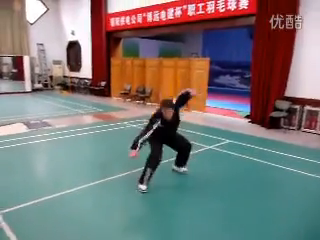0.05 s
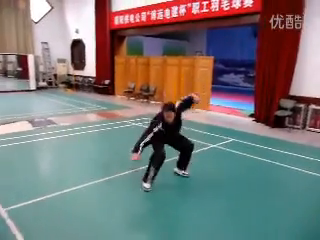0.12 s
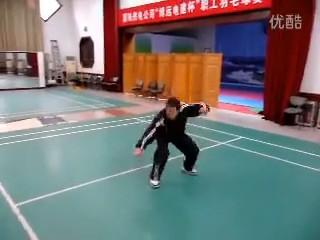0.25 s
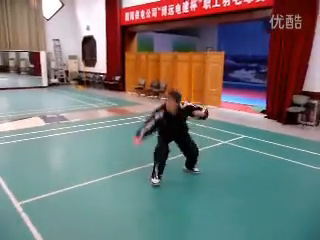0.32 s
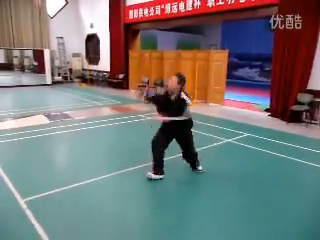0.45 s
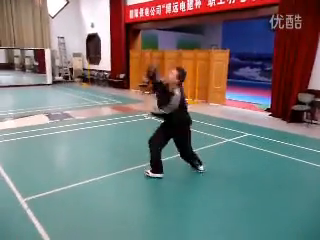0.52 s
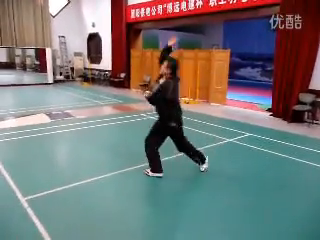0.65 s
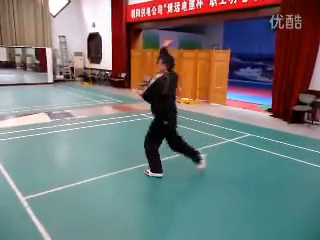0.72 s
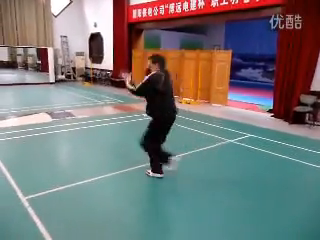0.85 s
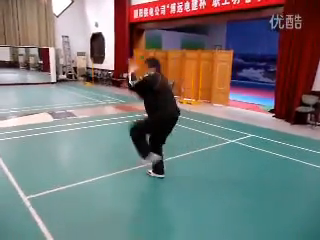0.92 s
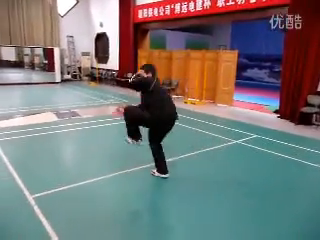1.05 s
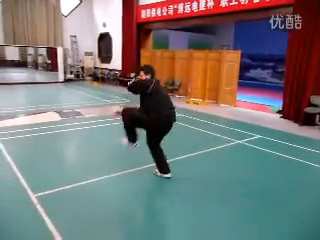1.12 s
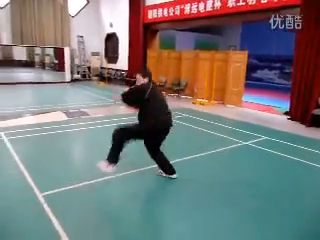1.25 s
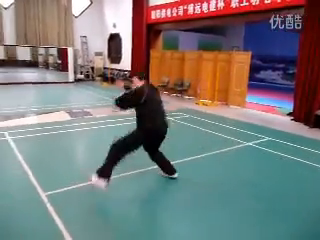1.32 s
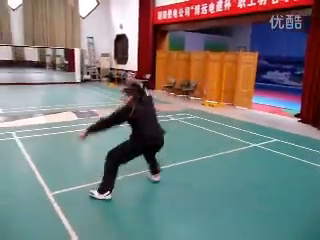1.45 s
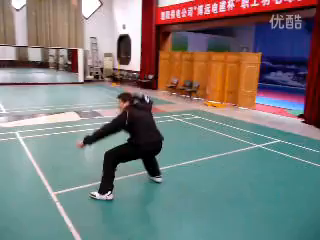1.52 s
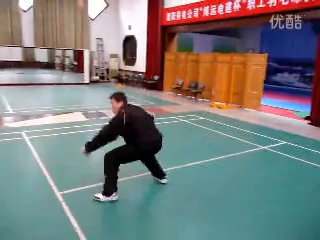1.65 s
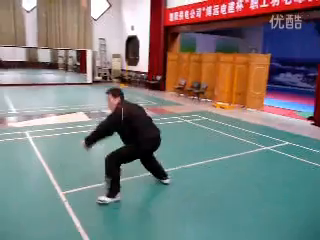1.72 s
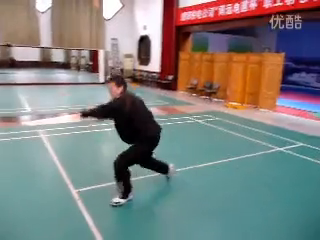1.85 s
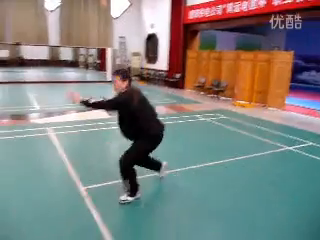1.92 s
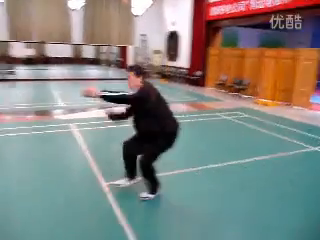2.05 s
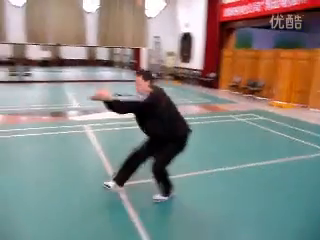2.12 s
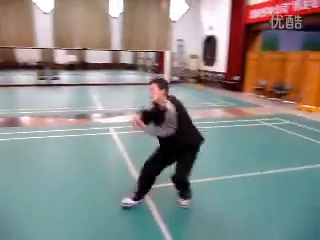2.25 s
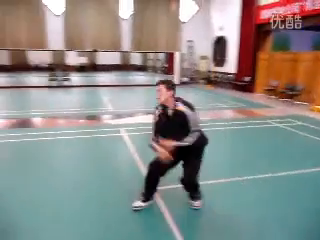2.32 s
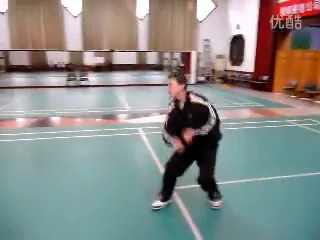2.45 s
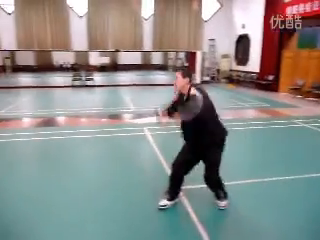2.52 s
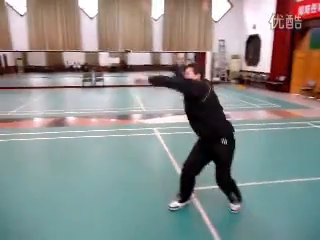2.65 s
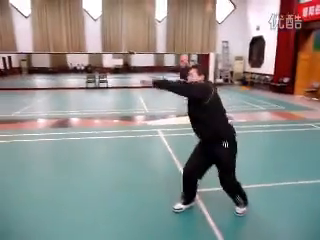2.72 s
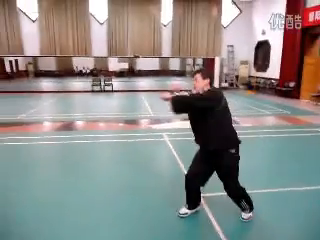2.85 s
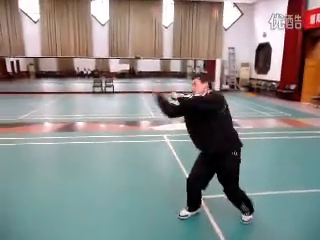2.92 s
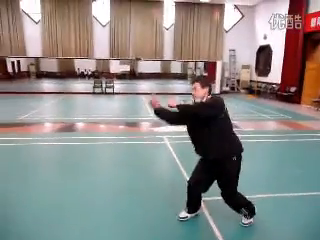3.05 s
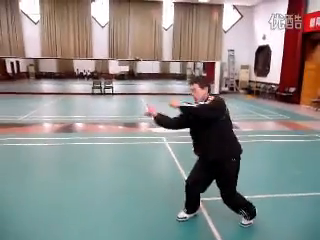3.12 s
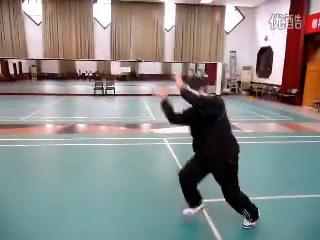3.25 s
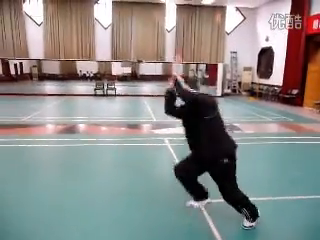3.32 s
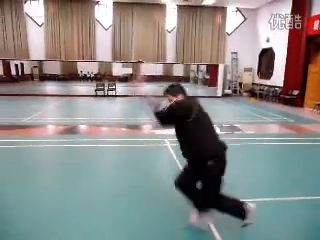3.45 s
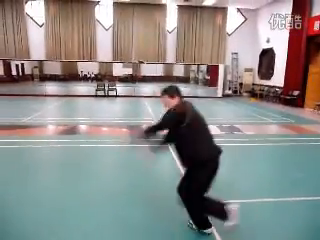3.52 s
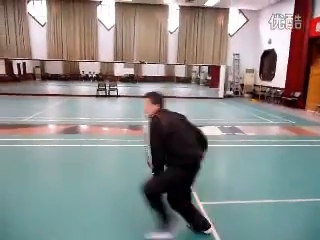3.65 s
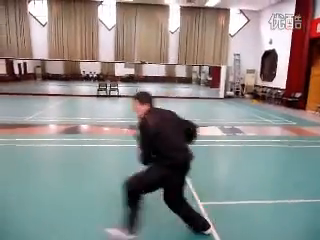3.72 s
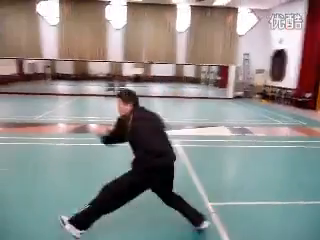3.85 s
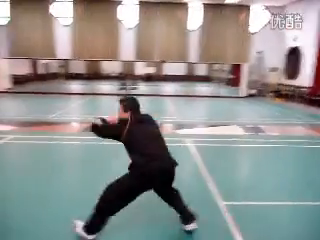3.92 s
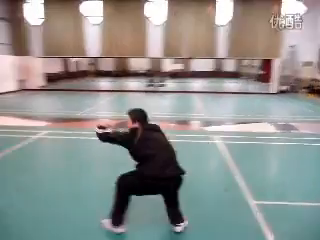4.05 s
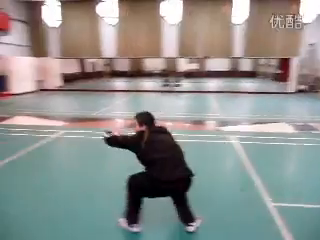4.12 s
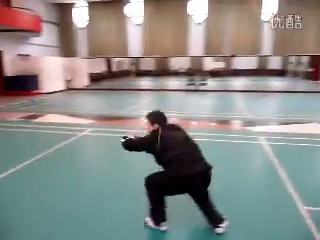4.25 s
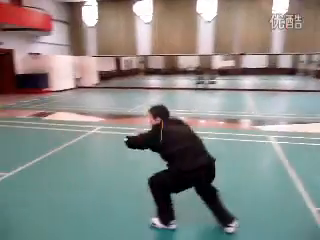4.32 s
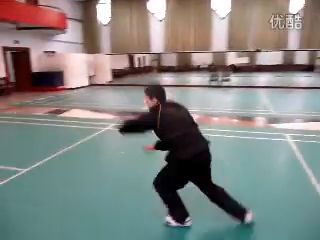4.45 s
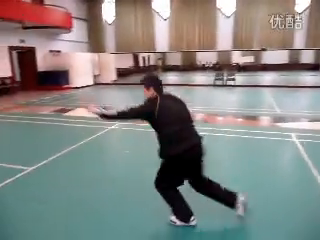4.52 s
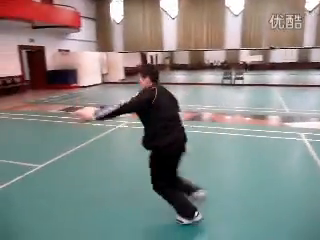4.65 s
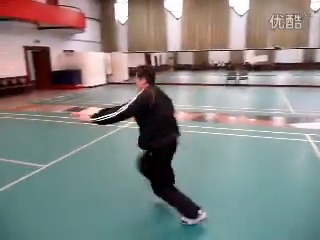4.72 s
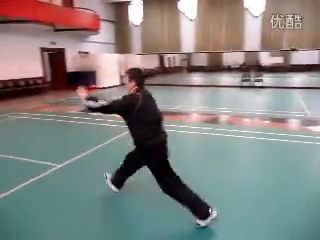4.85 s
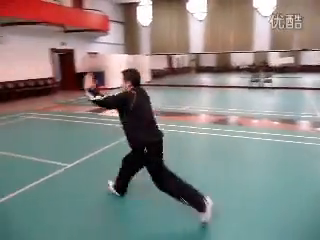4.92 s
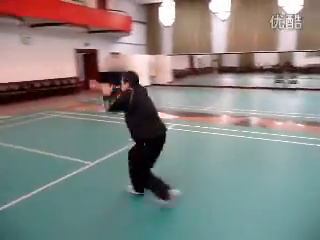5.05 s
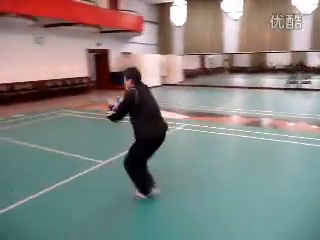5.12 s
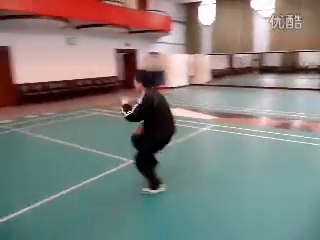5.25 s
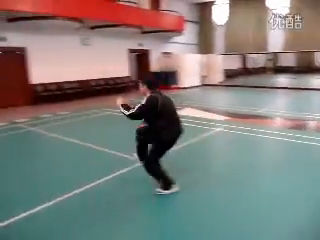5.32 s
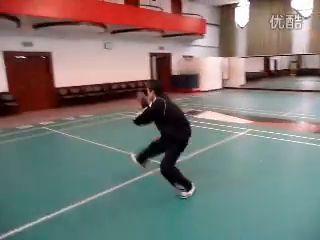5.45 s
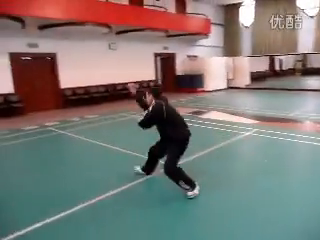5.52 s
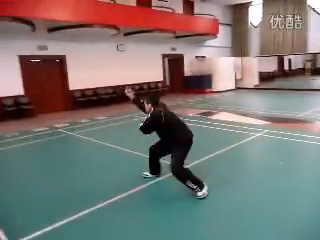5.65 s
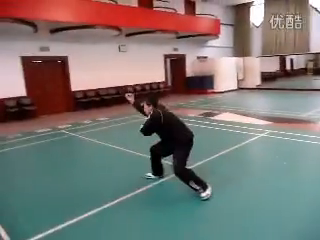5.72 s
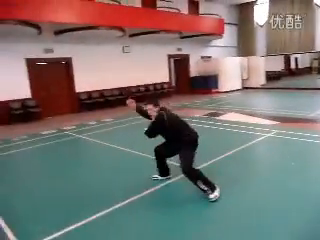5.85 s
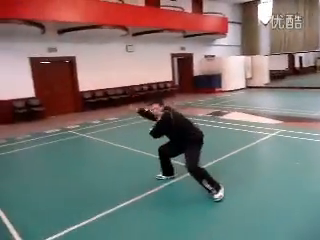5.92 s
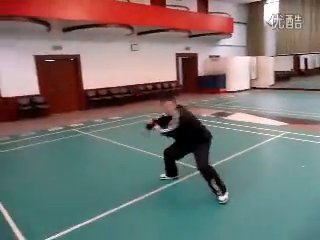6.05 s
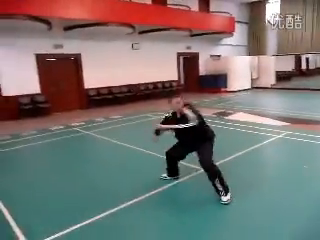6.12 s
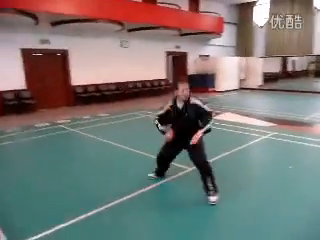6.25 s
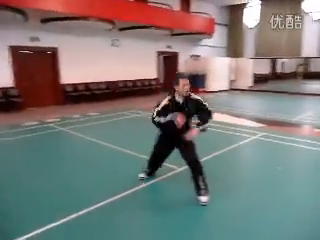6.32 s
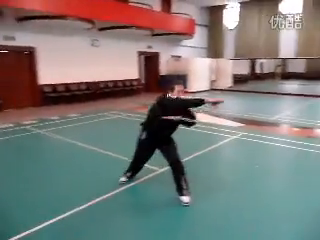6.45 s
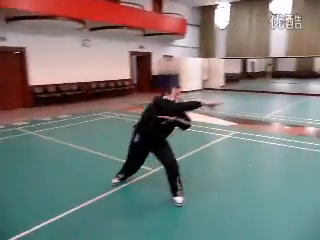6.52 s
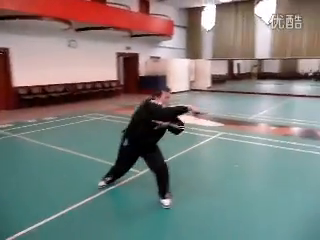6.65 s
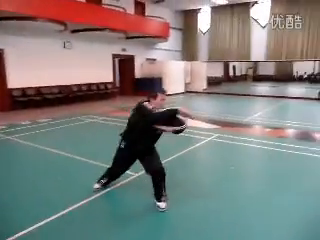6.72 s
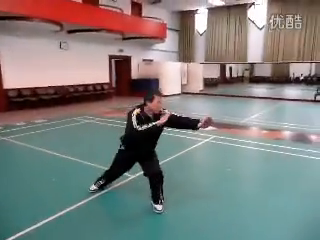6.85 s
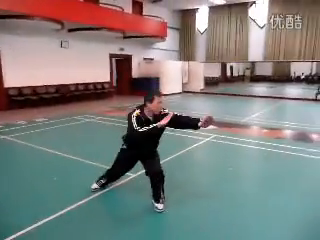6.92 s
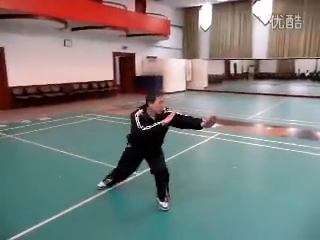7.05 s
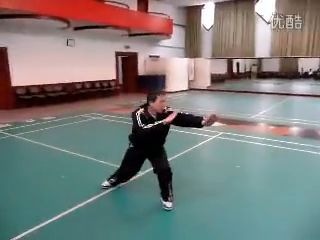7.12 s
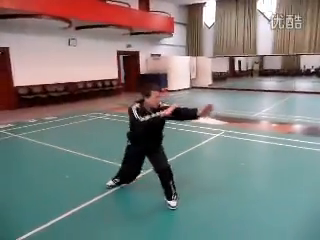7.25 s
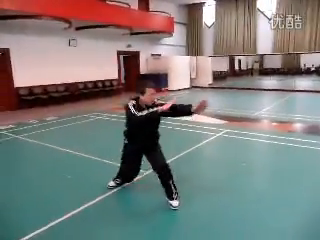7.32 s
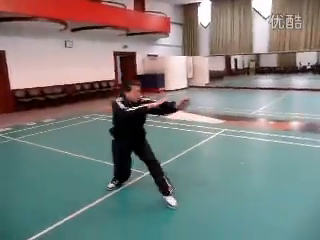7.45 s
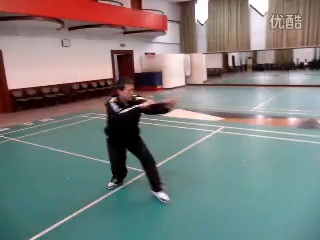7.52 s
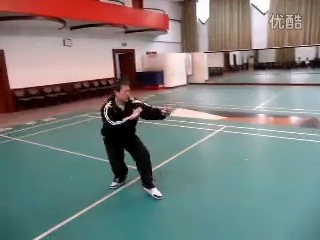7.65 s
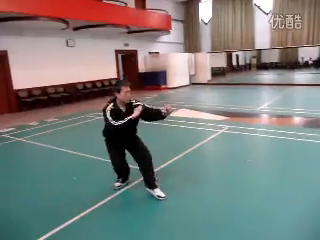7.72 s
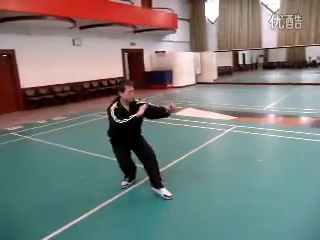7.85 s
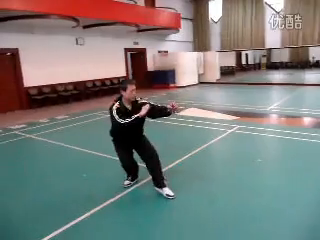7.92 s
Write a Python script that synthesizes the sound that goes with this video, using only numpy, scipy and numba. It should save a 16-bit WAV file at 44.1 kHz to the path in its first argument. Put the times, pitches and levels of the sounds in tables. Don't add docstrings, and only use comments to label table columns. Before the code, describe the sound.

A martial artist drills alone in a large, empty sports hall. Hard stamps and slaps crack at the start, then around one and a half, two, three and a half, five and five and a half seconds, the middle one loudest. Soft steps and sole scrapes fall between. Long echoes bloom over steady ventilation hiss. A small camera microphone dulls the treble and clips the loudest hits.

```python
import sys
import numpy as np
from scipy import signal
from scipy.io import wavfile
from scipy.ndimage import uniform_filter1d
from numba import njit

SR = 44100
rng = np.random.default_rng(int(sys.argv[2]) if len(sys.argv) > 2 else 0)


def ratio(d):
    e = np.asarray(d, float) / 20
    return 10 ** e


def transcribe(signal):
    frames = np.atleast_2d(signal).T
    limited = np.clip(frames, -1, 1)
    pcm = np.round(limited * 32767).astype(np.int16)
    wavfile.write(sys.argv[1], SR, pcm)


N = 352260

# centre in Hz, decay time to -60 dB in seconds, level in dB.
HALL_BANDS = [(58.6, 0.59, 11.5), (115.3, 1.45, 3), (269, 1.97, 2), (438.5, 1.81, 1.5), (920, 2, -6.5),
              (1656, 1.49, 2), (2720, 1.18, -2.5), (3900, 0.5, -5.5)]


def unit(x):
    return x / np.sqrt(np.mean(x ** 2))


def band(x, hz, width_hz):
    half = width_hz / hz / 2
    edge = np.sqrt(1 + half ** 2) + half
    return signal.sosfilt(signal.butter(2, [hz / edge, hz * edge], "band", fs=SR, output="sos"), x)


def walk(rate):
    hold = int(SR / rate)
    levels = np.repeat(rng.standard_normal(N // hold + 1), hold)
    slewed = uniform_filter1d(uniform_filter1d(levels, hold), hold)
    return unit(slewed[:N])


def add(into, s, x):
    start = max(int(s * SR), 0)
    into[start:start + len(x)] += x[:len(into) - start]


def ventilation():
    # frequency in Hz, density in dB per Hz.
    vent_spectrum = [(29, -48), (50, 7), (65, -11), (202, -0.5), (534, -4), (860, 0.5), (1010, -7.5),
                     (1580, -8), (1760, -5), (2000, -14), (2840, -10.5), (4020, -41.5), (5230, -52.5),
                     (8840, -120)]
    table_hz, table_db = np.transpose(vent_spectrum)
    air, swell = 0, walk(0.71)
    for hz in 45 * 2 ** np.arange(0, 7, .5):
        db = np.interp(np.log(hz), np.log(table_hz), table_db) + 10 * np.log10(hz)
        flicker_db = 0.28 * swell + 2.1 * walk(7.9)
        air = air + ratio(db + flicker_db) * unit(band(rng.standard_normal(N), hz, 0.44 * hz))
    whistle = unit(band(rng.standard_normal(N), 1772, width_hz=110))
    return ratio(-35) * unit(air) + ratio(-48 + 3 * walk(11)) * whistle


def slides():
    # middle in seconds, length in seconds, centre in Hz, level in dB.
    sole_slides = [(.18, 0.36, 1450, -35), (0.43, 0.26, 346, -34), (0.722, 0.074, 830, -42.5),
                   (.9, .2, 160, -38), (0.955, 0.18, 302, -35.5), (1.086, 0.22, 884, -37),
                   (4.058, 0.3, 2180, -38.5), (4.111, 0.008, 3200, -20.5), (4.62, 0.19, 407, -37.5),
                   (4.811, .06, 515, -33), (6.553, 0.2, 590, -33.5), (6.92, 0.12, 680, -36.5),
                   (7.242, 0.13, 414, -40.5), (7.298, 0.35, 150, -39), (7.635, 0.1, 935, -35.5)]
    out = np.zeros(N)
    t = np.arange(SR // 2) / SR - .25
    for s, length_s, hz, db in sole_slides:
        grains = rng.standard_normal(len(t)) * ratio(2 * rng.exponential(size=len(t)))
        swell = np.exp(-2 * (2 * t / length_s) ** 2)
        add(out, s - .25, ratio(db) * swell * unit(band(grains, hz, 1.1 * hz)))
    return out


def ring(hz, cycles):
    turns = hz * np.arange(4096) / SR
    onset = 1 - np.exp(-(turns / 0.56) ** 2)
    swing = -np.sin(2 * np.pi * turns) * onset * np.exp(-turns / cycles)
    return swing / abs(swing).max()


def thuds():
    # time in seconds, board level in dB, board pitch in Hz,
    # joist level in dB, joist pitch in Hz.
    landings = [
        (0.013, -11, 284, -30, 90),
        (0.421, -42, 248, -36, 110),
        (1.484, -9, 298, -33, 118.5),
        (1.948, -34.5, 250, -39, 91),
        (2.294, -6, 280, -32.5, 94.3),
        (3.592, 6.5, 268, -14, 102),
        (5.034, -16.5, 165.5, -29.5, 102.2),
        (5.144, -8.5, 277.3, -39.5, 96.9),
        (5.611, -9.5, 215, -16.5, 132),
        (6.501, -19.5, 318, -48.5, 151),
    ]
    hits = []
    for s, board_db, board_hz, joist_db, joist_hz in landings:
        board = ratio(board_db) * ring(board_hz, cycles=0.46)
        joist = ratio(joist_db) * ring(joist_hz, cycles=0.53)
        hits += [(s, board, -23), (s, joist, -10)]
    return hits


def slap(s, db, hz, crack_db, hall_db, cycles):
    t = np.arange(4096) / SR
    snap = .08 * rng.standard_normal(len(t)) * np.exp(-t / .0015)
    snap[int(.5 * SR / hz)] += 1
    crack = band(snap, 2130, 1600)
    crack = ratio(crack_db) * crack / abs(crack).max()
    crack_spread_db = 2.1
    return [(s, ratio(db) * ring(hz, cycles), hall_db),
            (s, ratio(db) * crack, hall_db + crack_spread_db)]


def steps():
    # time in seconds, peak in dB, air pocket in Hz.
    light_steps = [(0.647, -21.5, 800), (0.676, -19, 700), (1.989, -24, 675), (2.194, -24, 392),
                   (2.944, -22, 480), (3.424, -24.5, 560), (4.928, -20.5, 540), (5.013, -11, 760),
                   (6.407, -14.5, 830), (6.488, -20.5, 614), (6.944, -21, 660), (6.959, -25, 330)]
    hits = []
    for s, db, hz in light_steps:
        hits += slap(s + .001, db, hz, crack_db=-7, hall_db=-17, cycles=.8)
    return hits


def blows():
    # time in seconds, peak in dB, air pocket in Hz, skin crack in dB, hall share in dB.
    hard_blows = [(.0082, -7.5, 595, -11, -15.5), (.0134, -8, 700, -32, -15), (1.4819, 0, 665, -13.5, -18),
                  (2.293, 7.5, 725, -5, -20), (2.2958, -3, 904, -16, -11), (3.5912, -6, 1400, -4, -16.5),
                  (3.594, 8.5, 606, -11.5, -12.5), (3.5945, 20, 900, -8.5, -23),
                  (5.138, -14.5, 1452, -3.5, -14), (5.143, 2.5, 1934, -12, -27.5),
                  (5.1447, 5, 797, -7.5, -15), (5.608, 4, 1800, -7, -19.5),
                  (5.6095, -8.5, 587, -22.5, -14.5)]
    hits = []
    for s, db, hz, crack_db, hall_db in hard_blows:
        hits += slap(s, db, hz, crack_db, hall_db, cycles=0.67)
    return hits


def wash_envelopes():
    t = np.arange(2 * SR) / SR
    shapes = []
    for hz, t60, db in HALL_BANDS:
        swell = 1 - np.exp(-(t / (0.031 + 3.0 / hz)) ** 2)
        swell += ratio(7.5) * np.exp(-t / 0.0093)
        shapes.append(ratio(db - 60 * t / t60) * swell)
    return np.array(shapes)


def hall(diffuse, shapes):
    place = int(rng.integers(N))
    wash = np.einsum("bt,bt->t", shapes, diffuse[:, place:place + 2 * SR])
    when, sign, fade = rng.random((40, 3)).T
    at = ((.008 + .1 * when) * SR).astype(int)
    wash[at] += np.sign(sign - .2) * ratio(9.5 - 10 * fade)
    return ratio(-17) * wash


def scene():
    # delay in seconds, level in dB over the hall share.
    near_walls = [(.012, 0), (.031, 5.5), (.039, 1), (0.05, 5)]
    diffuse = np.array([band(rng.standard_normal(N + 2 * SR), hz, 0.74 * hz) for hz, _, _ in HALL_BANDS])
    shapes = wash_envelopes()
    out = np.zeros(N)
    for s, near, hall_db in thuds() + steps() + blows():
        add(out, s, near)
        add(out, s, ratio(hall_db) * signal.oaconvolve(near, hall(diffuse, shapes)))
        for delay_s, wall_db in near_walls:
            add(out, s + delay_s, ratio(wall_db + hall_db) * near)
    scrape = slides()
    out += scrape + ratio(-24) * signal.fftconvolve(scrape, hall(diffuse, shapes))[:N]
    return (out + ventilation())[None]


@njit
def duck(x, top, attack, release, slope):
    gain, follower = np.empty(len(x)), 0.
    for i in range(len(x)):
        level = abs(x[i])
        follower += (level - follower) * (attack if level > follower else release)
        gain[i] = min(1., (top / (follower + 1e-9)) ** slope)
    return gain


def band_limit(x):
    return signal.sosfilt(signal.butter(12, 13700, fs=SR, output="sos"), x)


def record(dry):
    gain = duck(dry[0], 0.31, 1 / (0.0026 * SR), 1 / (.09 * SR), 0.42)
    gain *= duck(dry[0], 0.87, 1 / (.003 * SR), 1 / (0.025 * SR), 1.5)
    cut = signal.sosfilt(signal.ellip(9, .5, 70, 4700, fs=SR, output="sos"), dry * gain)
    cut = signal.sosfilt(signal.butter(2, 3420, fs=SR, output="sos"), cut)
    cut = signal.sosfilt(signal.butter(2, 55, "high", fs=SR, output="sos"), cut)
    offset = -.066 * (.7 + .3 * uniform_filter1d(gain, size=SR // 2))
    clipped = np.clip(cut + offset, -1, 1)
    hiss = ratio(-89) * rng.standard_normal(N)
    return band_limit(clipped + hiss)


dry = scene()
out = record(dry)
transcribe(out)
```